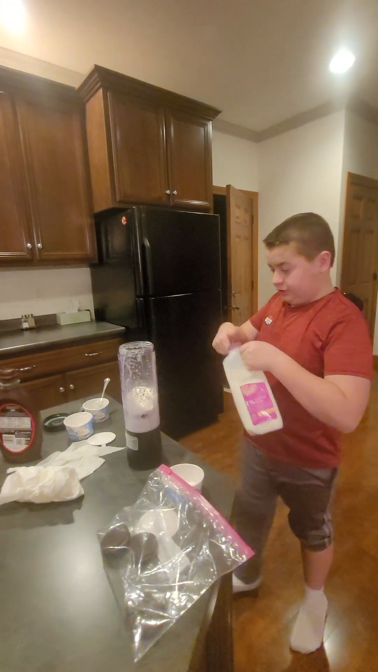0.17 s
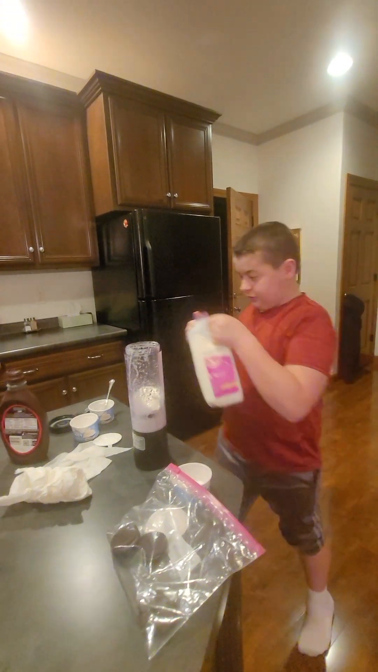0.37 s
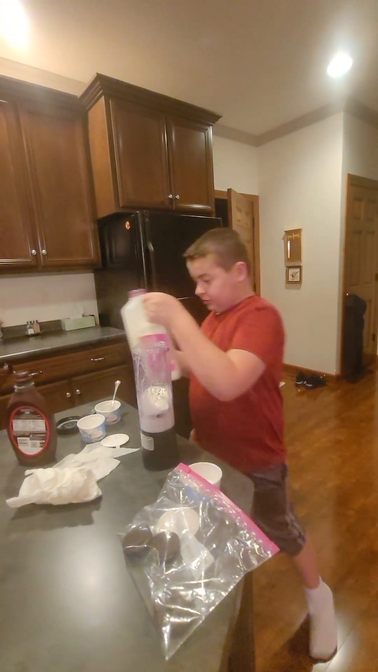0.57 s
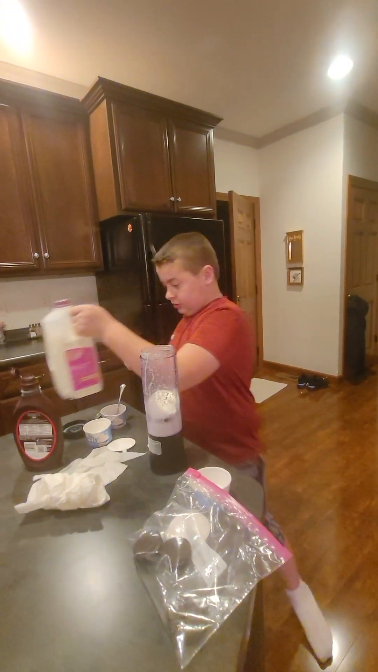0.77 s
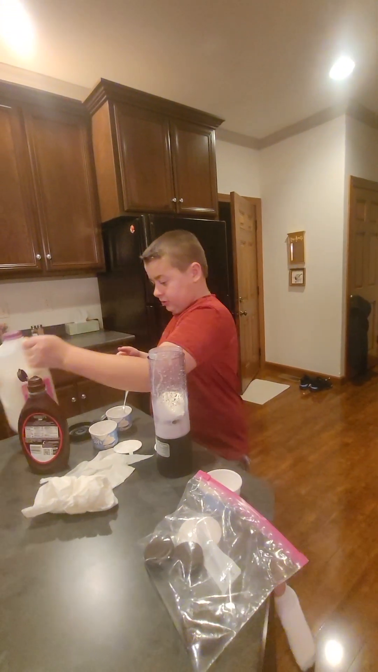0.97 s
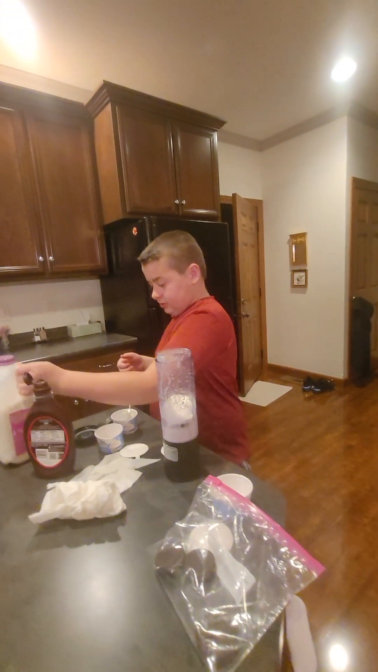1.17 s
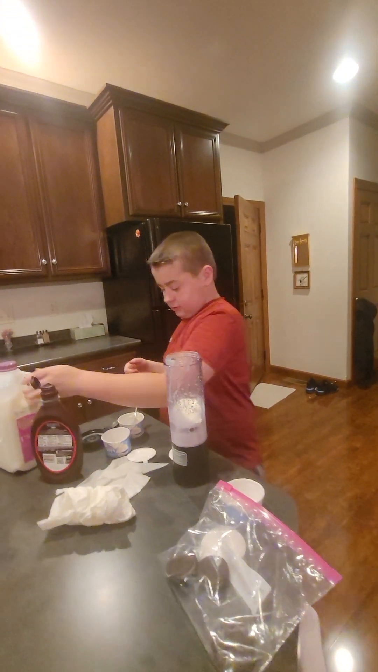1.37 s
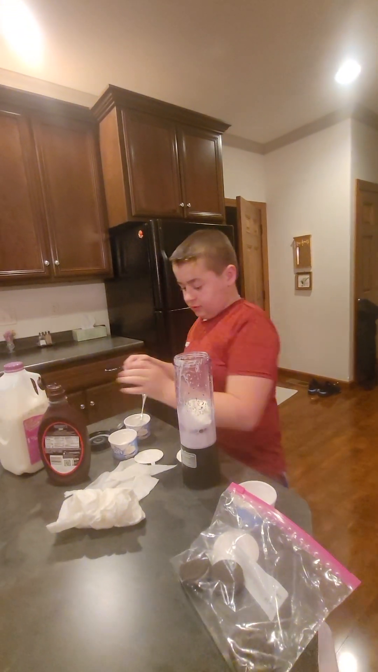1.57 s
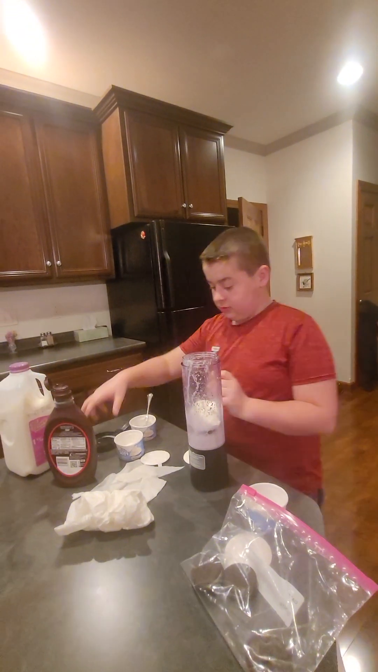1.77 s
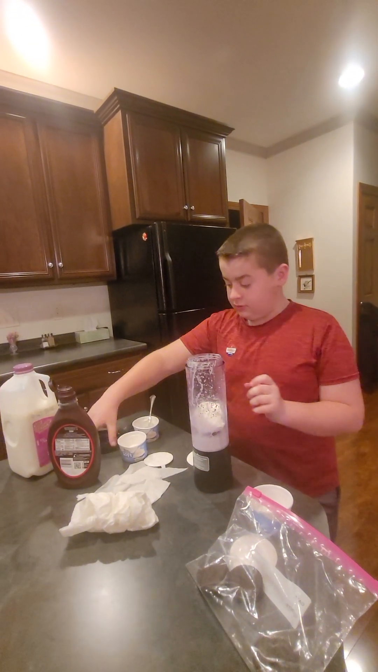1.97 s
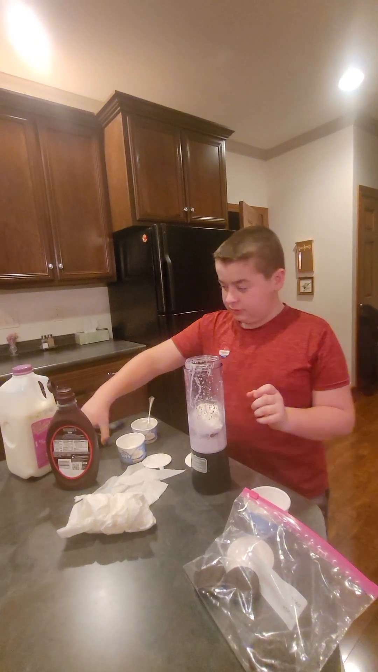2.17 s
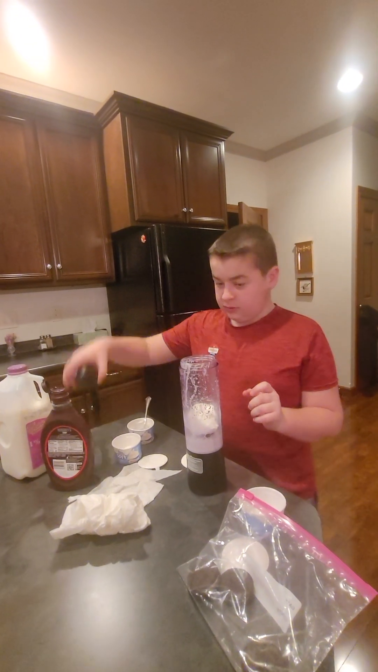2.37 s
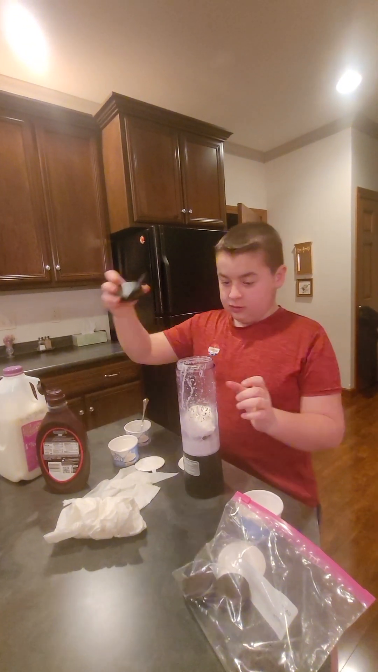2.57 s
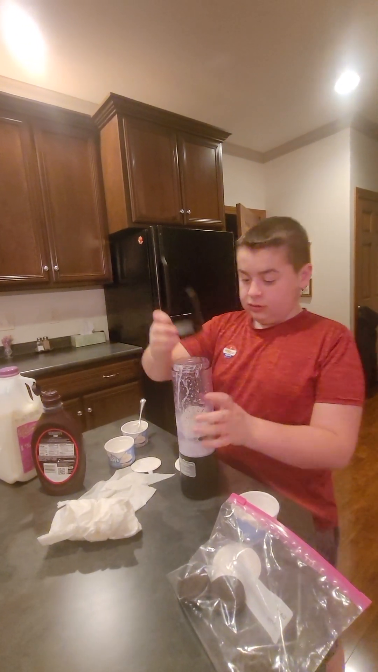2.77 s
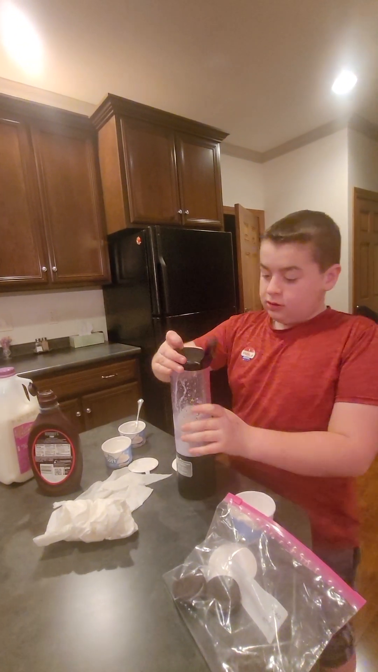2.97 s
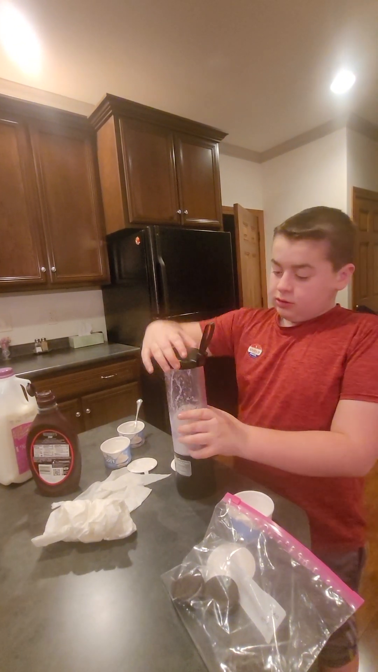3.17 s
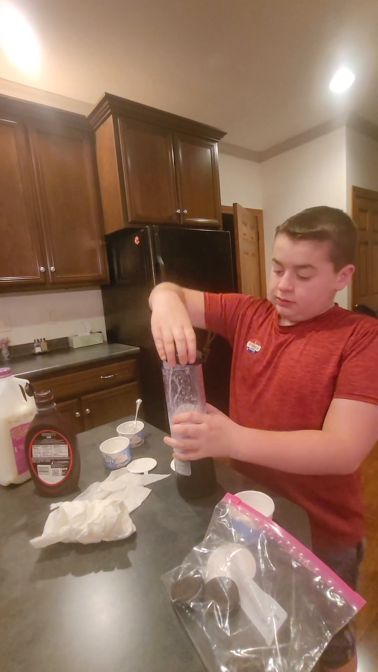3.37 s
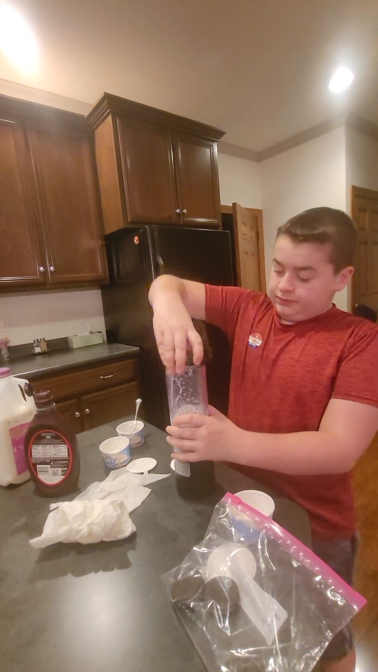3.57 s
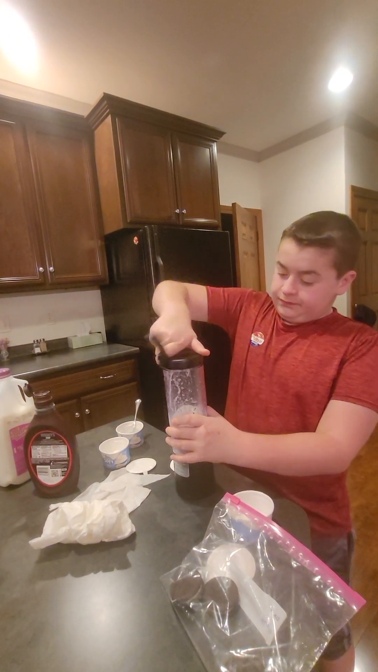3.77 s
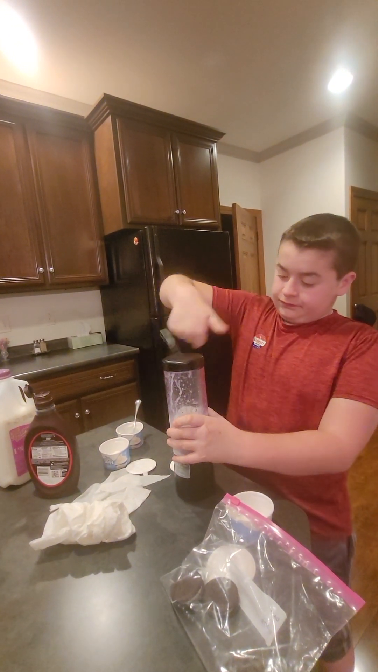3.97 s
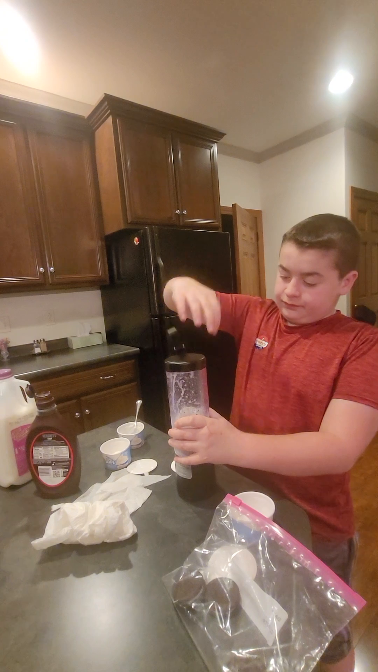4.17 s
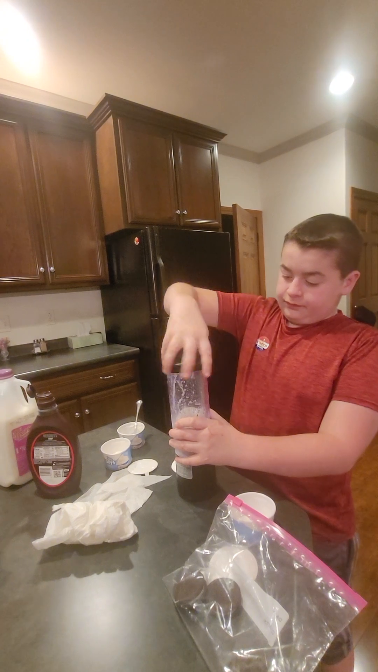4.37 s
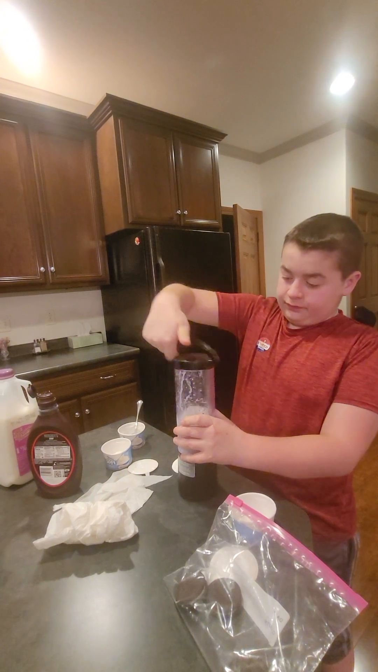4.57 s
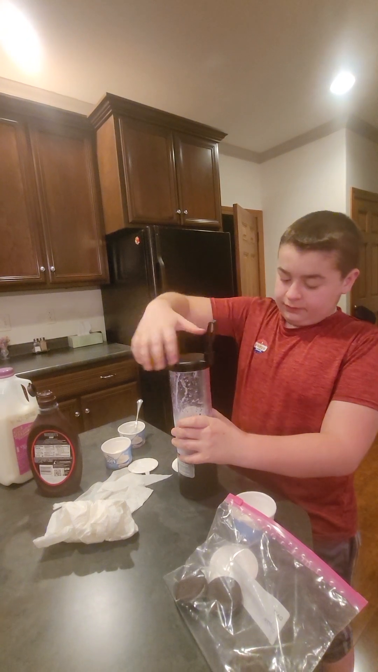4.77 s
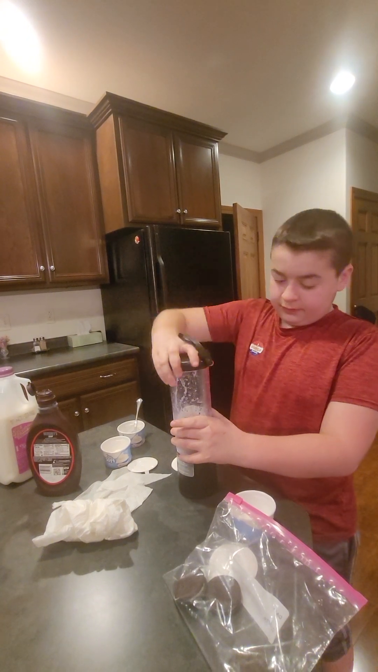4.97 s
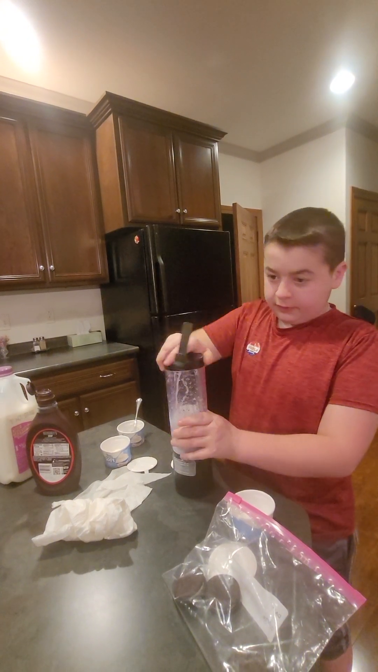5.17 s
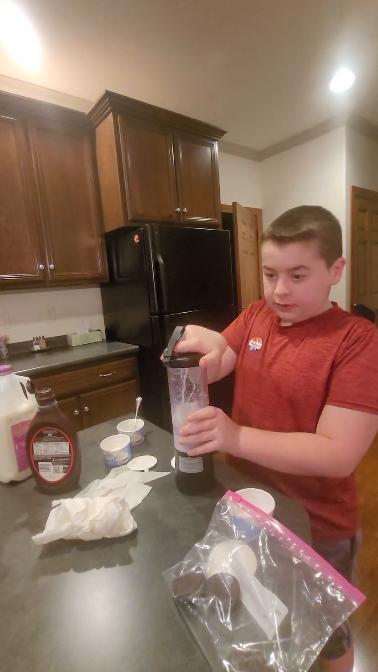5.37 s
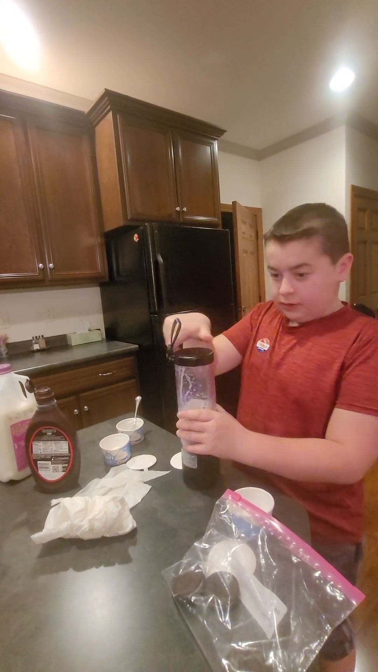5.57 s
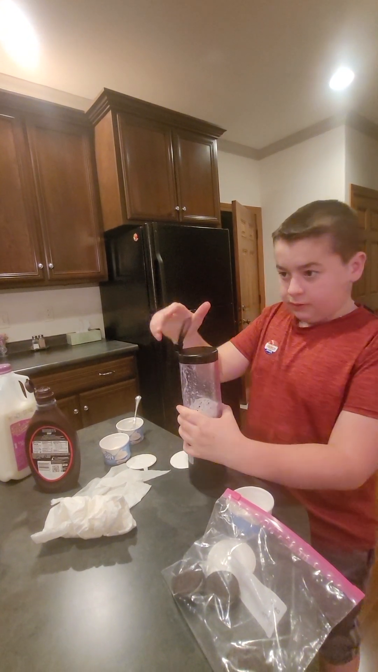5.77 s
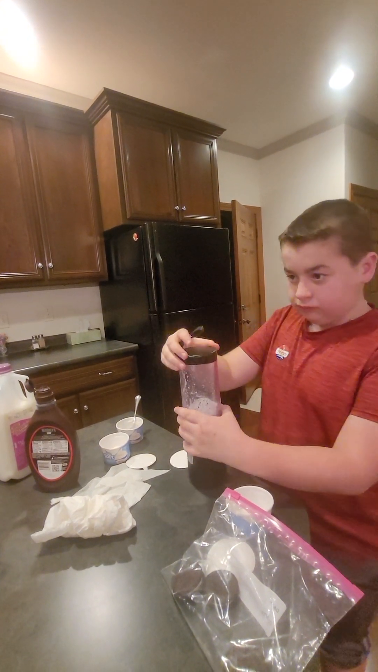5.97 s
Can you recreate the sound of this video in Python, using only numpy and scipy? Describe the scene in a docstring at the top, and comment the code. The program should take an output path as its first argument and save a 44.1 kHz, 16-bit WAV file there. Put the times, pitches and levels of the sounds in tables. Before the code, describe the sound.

A fairly live kitchen, heard close in stereo over a faint steady hiss. From 0 to 0.25 s a plastic jug is handled with soft, dull knocks and a cloth-like rustle. After near quiet, it lands at about 1.16 s with a low hollow thud, wobbling in a cluster of bumps until 1.4 s. At 2.0-2.1 s a lid scrapes off the counter in a short, rough, hollow stutter, dulling by 2.2 s; faint taps follow at 2.4 s. Bright hard clacks at 2.91 and 2.98 s put the lid on the cup, with small hollow knocks after. Presses at 3.4-3.65 s build to a strong snap at 3.69 s. Around 3.9 s come soft thumps, a palm scuff and a swelling rustle. Gritty twisting at 4.37 s leads to scattered low bumps. From 5.25 s, muted thuds, grinding, a tiny squeak near 5.5 s and dry hand rubs continue to 6 s.

```python
"""A plastic milk jug is handled and set down on a kitchen counter: contacts ring modes and a dense crack.
A lid is dragged off by stick-slip friction, tapped, then knocked onto a blender cup and pressed until
it snaps shut; it is twisted with grinding, rubs and squeaks, all as excited resonances of plastic.
Low thuds, soft pushes on low modes, come first from the jug on the counter, later from the cup on its base.
A soft broad hiss swells and sinks over a faint steady one, and a fairly live kitchen adds reflections."""
import sys
import numpy as np
from scipy import signal
from scipy.fft import rfft, irfft, next_fast_len
from scipy.io import wavfile

SR = 44100
rng = np.random.default_rng(int(sys.argv[2]) if len(sys.argv) > 2 else 0)


def persist_wave(psi):
    """Save psi, clipped to +-1, as 16-bit WAV."""
    counts = np.round(np.clip(psi, -1, 1) * 32767).astype(np.int16)
    wavfile.write(sys.argv[1], SR, np.atleast_2d(counts).T)


N = 265349
TIME = np.arange(N) / SR  # s
DETUNE = 0.025  # grip and point of contact shift each resonance by up to this share of its pitch

# Registers of a contact: low, middle, upper, treble. Each row: lower and upper edge in Hz.
REGISTERS = [(160, 540), (640, 2050), (2050, 3800), (3800, 17000)]
REGISTER_FILTERS = [signal.butter(4, edges, "band", fs=SR, output="sos") for edges in REGISTERS]
# Left-right likeness of diffuse sound. Each row: frequency in Hz, correlation (1 is identical).
LIKENESS = [(125, 0.9), (330, 0.96), (600, 0.44), (1200, 0.0053), (16000, 0.035)]
# Dense crack of the lid. Each row: frequency in Hz, relative density in dB per Hz.
LID_CRACK = [(150, -12), (400, 8.5), (580, -6), (1000, 9.5), (1500, 2.5), (2000, 1.5), (3000, -7.5),
             (5500, -6.5), (8500, -23), (11000, -19.5), (16000, -22.5)]
# Resonances of the cap on the gripped cup. Each row: frequency in Hz, relative level in dB, T60 in s.
CAP_MODES = [(267.5, 0, 0.06), (362, 5, .042), (829, 5.5, 0.011), (1086, 10.5, 0.013), (1218, -2.5, 0.025),
             (1585, 3.5, 0.031), (3180, -2, 0.021), (3970, 2.5, 0.011), (5060, 2, 0.009)]
# Hollow under the sliding lid. Each row: frequency in Hz, relative level in dB, T60 in s.
DRAG_MODES = [(564, -7, 0.042), (776, -6.5, 0.029), (885, -7, 0.088), (1230, -5, 0.0028),
              (1560, -6.5, 0.031), (1710, 6, 0.019), (2040, 2.5, 0.012), (2260, -2, 0.005),
              (2890, -19, 0.0021), (4660, -5, 0.00073)]


def lid_knocks():
    """Impact excitation: the loose lid rings its own modes on counter and cup."""
    # Each row: start in s, relative level in dB, brightness in dB per octave, length of contact in s.
    hits = [(1.755, -71, 7, 0.0011), (1.816, -55.5, -2, 0.002), (1.986, -59.5, -8, .0011),
            (2.911, -28, 1, 0.0026), (2.935, -40, -3, 0.0044), (2.960, -42, -6.5, 0.0023),
            (2.980, -26.5, 0, 0.0031), (3.186, -43.5, -1.5, 0.0037)]
    # Resonances of the lid. Each row: frequency in Hz, relative level in dB, T60 in s.
    modes = [(289.4, -5.5, 0.078), (321, 1, 0.063), (390, 3, .05), (448.3, 1, .075), (840, -0.5, 0.017),
             (1099, -10.5, 0.039), (1184, -6.5, 0.028), (1560, 3, .05), (1576, 3.5, 0.072),
             (1634, -1, 0.057), (2318, -11, 0.0074), (2572, -1, 0.056), (2770, -7, 0.043), (2907, 6, 0.03),
             (3100, 6.5, 0.032), (5320, -1, 0.017)]
    # Share of each register in turn, in dB.
    voice_db = [0, 0, -1, -9]
    return knocks(hits, voice_db, modes, LID_CRACK, crack_db=9.0, crack_t60=0.022)


def cap_presses():
    """Impact excitation: pressing and snapping the flip cap excites the cap on the gripped cup."""
    # Each row: start in s, relative level in dB, brightness in dB per octave, length of contact in s.
    hits = [(3.445, -71, 4.5, 0.0011), (3.488, -63, 4, 0.00092), (3.496, -55, 4, 0.0035),
            (3.506, -50, 0, 0.0019), (3.512, -46.5, 4, .002), (3.534, -46, -2.5, 0.00051),
            (3.623, -52, 2.5, 0.0082), (3.690, -38, 2.5, 0.0027), (3.699, -28.5, 1.5, 0.0028),
            (3.711, -46, -2, 0.0048), (4.008, -45.5, 0, 0.0035), (5.534, -64.5, -7.5, .006),
            (5.541, -50, 4, 0.0054), (5.552, -64.5, 6.5, 0.0087), (5.817, -61.5, -0.5, 0.0018)]
    # Share of each register in turn, in dB.
    voice_db = [3.5, 1.5, -5.5, -7]
    # Dense crack of the stiff cap. Each row: frequency in Hz, relative density in dB per Hz.
    crack_colour = [(150, 8.5), (380, 4), (520, -22.5), (750, -3.5), (1050, -6.5), (2200, -16), (5500, -18),
                    (7200, -17), (8600, -31.5), (11000, -19.5), (16000, -25)]
    return knocks(hits, voice_db, CAP_MODES, crack_colour, crack_db=9.5, crack_t60=0.042)


def seatings():
    """Cavity resonance: each time the lid gives way, the hollow of the cup answers with a short knock."""
    # Each row: start in s, peak in dB, length of push in s.
    pushes = [(3.016, -30.5, .0015), (3.120, -35, .0017), (3.15, -37.5, .002), (3.254, -52, 0.0038),
              (3.422, -45, 0.0011), (3.47, -59, .0018), (3.493, -31.5, 0.00069), (3.506, -22, 0.0023),
              (3.62, -31.5, 0.0014), (3.635, -26.5, 0.003), (3.654, -31, .0016), (3.672, -33.5, 0.00095),
              (3.688, -16, 0.0012), (3.745, -36.5, 0.00235), (3.888, -47, 0.00084), (4.051, -41.5, .0016)]
    # Hollow of the closed cup. Each row: frequency in Hz, relative level in dB, T60 in s.
    modes = [(242, -6.5, 0.065), (340, 0, .06), (370, 0.5, 0.04)]
    out = np.zeros((2, N))
    for s, db, length in pushes:
        knock = pushed(modes, TIME[:SR // 8], length, spread_db=4.0)
        add(out, s, from_db(db) * knock / np.abs(knock).max())
    return out


def twists():
    """Frictional grinding: slips of the turning lid against the rim ring the cap and its grit."""
    # Each row: start in s, relative level in dB, brightness in dB per octave, length of contact in s.
    hits = [(3.42, -70, -7.5, 0.059), (4.354, -45, 1, 0.012), (4.368, -46, 0, 0.019),
            (4.392, -49.5, -0.5, 0.024), (5.383, -52, -0.5, 0.036), (5.412, -58.5, -0.5, 0.031),
            (5.485, -54, 1, 0.063), (5.96, -63.5, -0.5, 0.082)]
    # Share of each register in turn, in dB.
    voice_db = [6, 2, -2, -10]
    # Grit of the rim. Each row: frequency in Hz, relative density in dB per Hz.
    grit_colour = [(150, 4.5), (370, 0.5), (600, -2.5), (1000, -5), (1600, -11), (2500, 2), (3500, -11.5),
                   (6000, -9), (8500, -28), (16000, -27.5)]
    return knocks(hits, voice_db, CAP_MODES, grit_colour, crack_db=17.0, crack_t60=0.014)


def squeaks():
    """Friction-excited resonance: the turning lid squeaks in its seat."""
    # Each row: middle in s, relative level in dB, half length (to 1/e) in s.
    strokes = [(5.39, -62, 0.017), (5.495, -51, 0.026), (5.525, -60.5, 0.011)]
    # Each row: frequency in Hz, relative level in dB, T60 in s.
    modes = [(2200, 0, 0.05), (2730, 4, 0.012), (4570, -6, 0.0077), (6740, -9, .005)]
    return friction(strokes, modes, slips_per_s=990, grain_db=0.0)


def rubs():
    """Friction-excited resonance: the hand shifts its grip on the lid."""
    # Each row: middle in s, relative level in dB, half length (to 1/e) in s.
    strokes = [(5.42, -55.5, 0.061), (5.52, -58, .012), (5.68, -54.5, 0.024), (5.75, -53.5, 0.032),
               (5.82, -63, 0.018), (5.99, -55.5, 0.046)]
    # Each row: frequency in Hz, relative level in dB, T60 in s.
    modes = [(560, 0, 0.019), (770, -1, 0.016), (960, -2, 0.012), (1260, -1.5, 0.012), (1660, -5.5, 0.0084)]
    return friction(strokes, modes, slips_per_s=1000, grain_db=3.5)


def drag(slips_per_s, grain_db, wander, wander_s, grit_db):
    """Stick-slip friction: the rim catches on the counter; the lid's hollow shifts in pitch as it tilts."""
    # Rough rub of the rim. Each row: frequency in Hz, relative density in dB per Hz.
    grit_colour = [(250, -21), (500, -3), (950, 2), (1300, -18), (1850, 3.5), (2700, -18), (5000, -21),
                   (9000, -49), (16000, -45)]
    start_s, fastest_s, lift_s = 1.99, 2.066, 2.097  # speeds up, slides on, leaves the counter
    plateau_db, swell_db_per_s, release_db_per_s = -37, 199, 598
    out, t = np.zeros((2, N)), start_s + TIME[:SR // 2]
    slips = random_slips(len(t), slips_per_s, grain_db)

    short = TIME[:SR // 10]
    grit = diffuse(grit_colour, size=len(short)) * fade(short, 0.0089)
    hollow = ringing(DRAG_MODES, short, spread_db=1.0)
    body = rms_one(hollow) + from_db(grit_db) * rms_one(grit)
    scrape = signal.fftconvolve(slips[None], body, axes=1)[:, :len(t)]

    # reading the scrape at a wandering speed bends its pitch
    tilt = np.interp((t - t[0]) / wander_s, np.arange(64), rng.uniform(-1.1, 1, size=64))
    position = np.cumsum(1 + wander * tilt)
    scrape = np.array([np.interp(position, np.arange(len(t)), side) for side in scrape])
    scrape = signal.sosfilt(signal.butter(2, 6500, fs=SR, output="sos"), scrape)

    # louder as the lid gathers speed
    swell_db = swell_db_per_s * np.maximum(fastest_s - t, 0)
    release_db = release_db_per_s * np.maximum(t - lift_s, 0)
    level_db = plateau_db - swell_db - release_db
    add(out, t[0], rms_one(scrape) * from_db(level_db))
    return out


def snags():
    """Impulse response: each harder snag of the rim taps the lid's hollow once; the last ones are dull."""
    # Each row: start in s, peak in dB, treble limit in Hz.
    catches = [(2.020, -33, 5000), (2.050, -28, 5000), (2.069, -31, 5000), (2.105, -35, 2500),
               (2.135, -40, 2000), (2.176, -45, 800), (2.197, -42, 700)]
    out = np.zeros((2, N))
    for s, db, limit_hz in catches:
        dulling = signal.butter(2, limit_hz, fs=SR, output="sos")
        tap = signal.sosfilt(dulling, ringing(DRAG_MODES, TIME[:SR // 10], spread_db=1.0))
        add(out, s, from_db(db) * tap / np.abs(tap).max())
    return out


def taps():
    """Impact excitation: the lifted lid taps its neighbours and rings their plastic."""
    # Each row: start in s, relative level in dB, brightness in dB per octave, length of contact in s.
    hits = [(2.417, -59.5, 1, .005), (2.445, -56.5, 0, 0.0018)]
    # Resonances of the tapped plastic. Each row: frequency in Hz, relative level in dB, T60 in s.
    modes = [(275, -3.5, 0.057), (443, -6.5, 0.042), (1190, 2, 0.045), (1325, 5, 0.045), (1464, -3, .055),
             (2254, -4.5, 0.035), (3236, -7.5, 0.025)]
    # Share of each register in turn, in dB.
    voice_db = [1.5, 0, -6, -8]
    return knocks(hits, voice_db, modes, LID_CRACK, crack_db=-5.5, crack_t60=0.01)


def jug_knocks():
    """Impact excitation: the jug is handled, lands edge by edge and wobbles, ringing its walls."""
    # Each row: start in s, relative level in dB, brightness in dB per octave, length of contact in s.
    hits = [(0.001, -57, -0.5, 0.018), (0.079, -47, -2.5, 0.0016), (0.11, -56, -0.5, 0.016),
            (0.222, -55.5, 5, 0.027), (1.160, -41, 4.5, 0.0045), (1.166, -38, -3, 0.0042),
            (1.177, -40, -0.5, 0.016), (1.194, -39, -1.5, 0.0058), (1.214, -49.5, -3.5, 0.0043),
            (1.233, -47, -4, 0.019), (1.252, -53.5, 0.5, 0.0022), (1.2575, -41.5, 3, 0.0031),
            (1.273, -49, -2.5, 0.0021), (1.285, -44.5, 1.5, 0.0035), (1.365, -57.5, 3, 0.0011),
            (1.405, -48, 2.5, 0.0011), (1.418, -55.5, 5, 0.015)]
    # Resonances of the jug. Each row: frequency in Hz, relative level in dB, T60 in s.
    modes = [(161.5, -9.5, 0.084), (220.7, -4.5, 0.076), (232, -2, 0.1), (290, 0, 0.053), (334, -11.5, 0.1),
             (392, 1.5, 0.031), (529, -1.5, 0.015), (880, -44, .05), (920, -3, 0.11), (1413, -39, .016),
             (1750, -28, .029), (2780, -17, 0.018)]
    # Share of each register in turn, in dB.
    voice_db = [14, 1, -9, -17.5]
    # Dense crack of the jug. Each row: frequency in Hz, relative density in dB per Hz.
    crack_colour = [(150, -36), (400, -2), (900, 7), (1500, -3.5), (3000, -25), (6000, -24.5), (9000, -35),
                    (16000, -36)]
    return knocks(hits, voice_db, modes, crack_colour, crack_db=1.5, crack_t60=0.064)


def thuds(spread_db, swell_s, pitch_spread):
    """Low modal response: soft pushes boom, first the jug on the counter, later the cup on its base."""
    # Soft bumps: the jug until 1.405 s, then the cup. Each row: start in s, peak in dB, length of push in s.
    pushes = [(0.0, -33, 0.001), (0.078, -32, 0.00091), (1.166, -21, 0.0026), (1.205, -25.5, 0.004),
              (1.25, -24.5, 0.0047), (1.405, -36, .005), (1.608, -49, 0.0043), (2.914, -32.5, 0.0061),
              (2.981, -25, 0.0025), (3.031, -37, 0.0079), (3.118, -37.5, 0.0083), (3.18, -44, 0.0084),
              (3.275, -43.5, 0.0025), (3.497, -35.5, 0.0059), (3.623, -32, 0.002), (3.694, -27.5, 0.012),
              (3.745, -38, 0.0086), (3.905, -28.5, 0.0097), (3.937, -29.5, 0.0062), (3.977, -38.5, 0.0079),
              (4.03, -47, 0.0046), (4.366, -38, 0.0062), (4.531, -29.5, 0.0081), (4.613, -41, .002),
              (4.681, -35, .0018), (4.722, -35, 0.0041), (4.765, -43, 0.0092), (4.837, -54.5, 0.0013),
              (4.901, -42, .002), (5.249, -38, 0.0069), (5.407, -29.5, 0.0058), (5.536, -42, 0.0054),
              (5.661, -27.5, 0.0024), (5.729, -29, 0.0089), (5.786, -40.5, 0.0032), (5.84, -45, 0.0051),
              (5.983, -45, 0.0038)]
    # Low resonances shared by all thuds. Each row: frequency in Hz, relative level in dB, T60 in s.
    low_modes = [(68.3, -28.5, 0.17), (101.5, -13.5, 0.02), (126.5, -3.5, .13), (146, -15.5, 0.085),
                 (216, -4, .048), (254.4, -11, 0.1), (303, -2, 0.034)]
    out, t = np.zeros((2, N)), TIME[:SR // 4]
    for s, db, length in pushes:
        # the pitch shifts from thud to thud
        modes = np.array(low_modes) * [1 + pitch_spread * rng.uniform(-1, 1), 1, 1]
        boom = pushed(modes, t, length, spread_db) * (1 - np.exp(-t / swell_s))
        add(out, s, from_db(db) * boom / np.abs(boom).max())
    return out


def ticks(t60, width_hz):
    """Narrow-band transient: each tick is a few milliseconds of very high noise."""
    # Each row: start in s, peak in dB, centre frequency in Hz.
    tiny_ticks = [(0.319, -43, 11600), (0.611, -35, 13000), (3.607, -37, 14800), (3.973, -31, 13900)]
    out, t = np.zeros((2, N)), TIME[:1024]
    for s, db, hz in tiny_ticks:
        band = [(hz - width_hz, -30), (hz, 0), (hz + width_hz, -30), (SR, -80)]  # Hz, dB
        tick = diffuse(band, size=len(t)) * fade(t, t60)
        add(out, s, from_db(db) * tick / np.abs(tick).max())
    return out


def knocks(hits, voice_db, modes, crack_colour, crack_db, crack_t60):
    """Modal and statistical response: slips ring a body's modes and add a dense, quickly dying crack."""
    out, t = np.zeros((2, N)), TIME[:4096]
    for s, level_db, brightness_db, length in hits:
        slips = contact(t, length)
        body = signal.fftconvolve(ringing(modes, t, spread_db=3.5), slips[None], axes=1)[:, :len(t)]
        # the powers of overlapping cracks add
        crack_power = np.abs(signal.fftconvolve(slips ** 2, fade(t, crack_t60) ** 2)[:len(t)])
        crack = from_db(crack_db) * diffuse(crack_colour, size=len(t)) * np.sqrt(crack_power)
        add(out, s, voiced(body + crack, voice_db, level_db, brightness_db))
    return out


def contact(t, length):
    """Contact mechanics: a short contact is one blow, a long one a swelling cluster of tiny slips."""
    length = max(length, 5e-4)
    happens = rng.random(len(t)) < 2500 / SR  # slips per second
    swell = np.exp(-2 * (t / length - .5) ** 2)
    slips = rng.standard_normal(len(t)) * happens * swell
    slips[0] += 12 * np.exp(-length / 0.0026)
    return slips


def voiced(sound, voice_db, level_db, brightness_db):
    """Spectral balance: a contact's energy is shared among registers, referred to 20 ms."""
    octaves = np.log2(REGISTERS).mean(axis=1)
    gains = from_db(level_db + np.array(voice_db) + brightness_db * (octaves - octaves[1]))
    parts = [signal.sosfilt(sos, sound) for sos in REGISTER_FILTERS]
    # both microphones are about equally far from the contact
    heard = sum(gain * np.array([rms_one(side) for side in part]) for part, gain in zip(parts, gains))
    return heard * np.sqrt(.02 * SR / sound.shape[1])


def pushed(modes, t, length, spread_db):
    """Force-pulse excitation: a soft push drives the modes; longer pushes are duller."""
    push = np.sin(np.pi * np.clip(t / max(length, 5e-4), 0, 1)) ** 2
    return signal.fftconvolve(ringing(modes, t, spread_db), push[None] / push.sum(), axes=1)[:, :len(t)]


def random_slips(size, slips_per_s, grain_db):
    """Random point process: slips of either sign, their strengths spread by grain_db."""
    happens = rng.random(size) < slips_per_s / SR
    strength = from_db(grain_db * rng.standard_normal(size))
    return happens * strength * rng.choice([-1, 1], size)


def friction(strokes, modes, slips_per_s, grain_db):
    """Friction excitation: random slips ring the plastic while a stroke lasts."""
    slips = random_slips(N, slips_per_s, grain_db)
    effort = swell_and_fade(strokes)
    body = ringing(modes, TIME[:SR // 10], spread_db=10.5)
    unit_body = rms_one(body) / np.sqrt(body.shape[1])
    return signal.fftconvolve((rms_one(slips) * effort)[None], unit_body, axes=1)[:, :N]


def ringing(modes, t, spread_db):
    """Modal superposition: slightly detuned damped sines; short waves reach the two sides out of step."""
    hz, db, t60 = np.transpose(modes)[:, :, None]
    hz = hz * (1 + DETUNE * rng.uniform(-1, 1, hz.shape))
    unlike = np.clip(1 - at_hz(LIKENESS, hz), 0, 1)
    phase = np.pi / 4 * unlike * rng.choice([-1, 1], hz.shape) * [[[1]], [[-1]]]
    sign = (-1) ** np.arange(len(modes))[:, None]
    gain = from_db(db + spread_db * rng.standard_normal(hz.shape)) * sign
    sines = np.sin((2 * np.pi * hz * t + phase).astype(np.float32))
    return np.sum(gain * fade(t, t60) * sines, axis=1)


def fade(t, t60):
    """Exponential damping: decay by 60 dB in t60."""
    return from_db(-60 * t / np.maximum(t60, 1e-4))


def diffuse(spectrum, size):
    """Interchannel coherence: stereo noise of a given colour, alike on both sides mainly in the bass."""
    hz = np.linspace(0, SR / 2, size // 2 + 1)
    mid, side = rfft(rng.standard_normal((2, size)))
    alike = np.clip(at_hz(LIKENESS, hz), -.99, .99)
    both = np.sqrt(1 + alike) * mid + np.sqrt(1 - alike) * side * [[1], [-1]]
    return rms_one(irfft(both * from_db(at_hz(spectrum, hz)), size))


def from_db(db):
    """Logarithmic level: decibels to amplitude gain."""
    return 10 ** (np.asarray(db) / 20)


def rms_one(x):
    """Normalization: scale to unit rms."""
    return x / np.sqrt(np.mean(x ** 2) + 1e-20)


def at_hz(points, hz):
    """Interpolation: read a table on a log-frequency axis."""
    f, value = np.transpose(points)
    return np.interp(np.log(np.maximum(hz, 1)), np.log(f), value)


def add(out, s, sound):
    """Superposition: mix a sound in at time s."""
    start = max(0, round(s * SR))
    out[:, start:start + sound.shape[1]] += sound[:, :N - start]


def kitchen(x, build_s):
    """Reverberation: diffuse reflections build up quickly and die away band by band."""
    # Each row: frequency in Hz, T60 in s.
    room_t60 = [(60, 0.88), (250, 0.32), (1000, 0.49), (3000, 0.31), (6000, 0.53), (16000, 0.08)]
    # Each row: frequency in Hz, level in dB against the sound fed to the room.
    room_db = [(60, 6), (125, -4), (350, -6.5), (1000, -6), (3000, -6), (6000, -9.5), (16000, -6.5)]
    t, response = TIME[:SR * 4 // 5], 0
    edges = np.geomspace(45, 18000, 14)  # Hz
    for low, high in zip(edges, edges[1:]):
        hz = np.sqrt(low * high)
        band_filter = signal.butter(2, [low, high], "band", fs=SR, output="sos")
        band = signal.sosfilt(band_filter, diffuse([(1, 0)], size=len(t)))
        tail = band * fade(t, at_hz(room_t60, hz)) * (1 - np.exp(-(t / build_s) ** 2))
        share = np.sqrt(2 * (high - low) / SR / len(t))  # energy in proportion to bandwidth
        response = response + rms_one(tail) * share * from_db(at_hz(room_db, hz))
    return signal.fftconvolve(x, response, axes=1)[:, :N]


def swell_and_fade(swells):
    """Amplitude envelope: each swell rises and fades as a Gaussian."""
    return sum(from_db(db) * np.exp(-((TIME - s) / half_s) ** 2) for s, db, half_s in swells)


def swishes(swells, colour):
    """Amplitude-modulated noise: coloured noise rises and fades with each swell."""
    return diffuse(colour, size=next_fast_len(N, True))[:, :N] * swell_and_fade(swells)


def swelling_hiss():
    """Amplitude-modulated noise: a soft broad hiss swells and sinks, perhaps cloth."""
    # Each row: middle in s, level in dB, half length (to 1/e) in s.
    swells = [(0.09, -54.5, 0.15), (0.72, -60.5, 0.26), (1.718, -57, 0.26), (2.486, -65.5, 0.43),
              (3.623, -59, 0.17), (3.935, -51.5, 0.15), (4.359, -60, 0.26), (5.474, -62.5, 0.38)]
    # Each row: frequency in Hz, relative density in dB per Hz.
    colour = [(150, -41), (250, -1.5), (336, -2), (597, -12), (662, -9), (1060, -14.5), (1730, -10),
              (2670, -16), (4650, -13.5), (7310, -18), (8400, -30.5), (10000, -25), (16000, -33.5)]
    return swishes(swells, colour)


def finger_brushes():
    """Friction noise: fingers brush over smooth plastic with a high-pitched rush."""
    # Each row: middle in s, level in dB, half length (to 1/e) in s.
    moves = [(0.15, -68, 0.18), (2.06, -68.5, .08), (2.72, -69, 0.037), (3.8, -67.5, 0.26),
             (4.15, -82, 0.26), (4.55, -67.5, 0.1), (5.59, -65, 0.084)]
    # Each row: frequency in Hz, relative density in dB per Hz.
    colour = [(4000, -15), (8500, -9), (11000, -1), (14000, -1), (16000, -2)]
    return swishes(moves, colour)


def palm_scuffs():
    """Friction noise: the palm creeps on the cup with a low scuff."""
    # Each row: middle in s, level in dB, half length (to 1/e) in s.
    moves = [(3.95, -45, 0.099), (4.62, -54.5, 0.16), (5.28, -55.5, 0.1), (5.69, -45.5, 0.038)]
    # Each row: frequency in Hz, relative density in dB per Hz.
    colour = [(40, -6), (120, 3.5), (330, 0.5), (460, -5), (620, -21.5), (2000, -49), (6000, -81)]
    return swishes(moves, colour)


def steady_hiss():
    """Stationary noise: a faint coloured hiss at constant level."""
    # Each row: frequency in Hz, relative density in dB per Hz.
    colour = [(25, -7.5), (134, -5), (300, -6), (440, -4.5), (640, -21), (1130, -23), (1650, -27.5),
              (3500, -23.5), (5100, -10.5), (6800, -16.5), (8400, -30.5), (14500, -26.5), (16000, -46.5)]
    return from_db(-69) * diffuse(colour, size=next_fast_len(N, True))[:, :N]


def scene():
    """Direct and reverberant sound: the farther jug comes more by the walls, the thuds less."""
    lid = lid_knocks() + taps() + snags()
    lid += drag(slips_per_s=2200, grain_db=4.5, wander=.13, wander_s=.02, grit_db=-7.5)
    close = lid + cap_presses() + twists() + squeaks() + rubs()
    jug = jug_knocks()
    low_thuds = thuds(spread_db=3.0, swell_s=.02, pitch_spread=.05)
    cup = seatings()
    # the thuds stay mostly in the counter
    to_walls = close + jug + from_db(-6) * low_thuds + from_db(-8.5) * cup
    walls = kitchen(to_walls, build_s=0.0032)
    direct = close + cup + low_thuds + from_db(-2.5) * jug
    handling = direct + walls + ticks(t60=0.0041, width_hz=1900)
    # the deepest bass is rolled off
    handling = signal.sosfilt(signal.butter(2, 55, "high", fs=SR, output="sos"), handling)
    return handling + swelling_hiss() + finger_brushes() + palm_scuffs() + steady_hiss()


def record(dry):
    """Microphone response: the left is brighter, the right fuller; the top is cut."""
    # Each row: frequency in Hz, left minus right in dB.
    balance_db = [(100, -2.5), (350, -5.5), (700, -2.5), (1300, -1), (2800, 2.5), (5000, 12.5), (8000, 20),
                  (14000, -1.5)]
    cutoff_hz = 16200
    size = next_fast_len(N + SR // 10, True)
    tilt_db = at_hz(balance_db, np.linspace(0, SR / 2, size // 2 + 1))
    gains = from_db(tilt_db * np.array([[.5], [-.5]]))
    gains = gains / np.sqrt(np.mean(gains ** 2, axis=0))  # unit mean power gain of the two sides
    heard = irfft(rfft(dry, size) * gains, size)[:, :N]
    return signal.sosfilt(signal.ellip(10, .2, 80, cutoff_hz, fs=SR, output="sos"), heard)


dry = scene()
out = record(dry)
persist_wave(out)
```